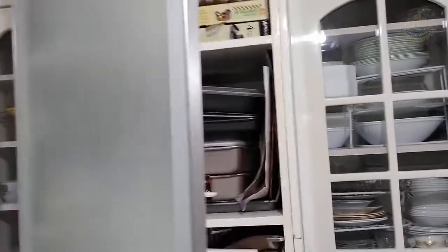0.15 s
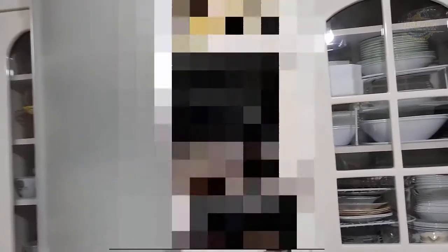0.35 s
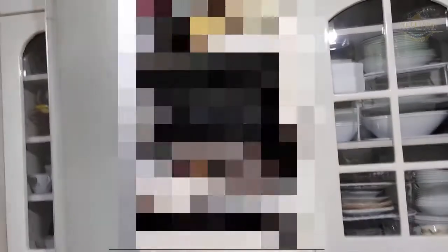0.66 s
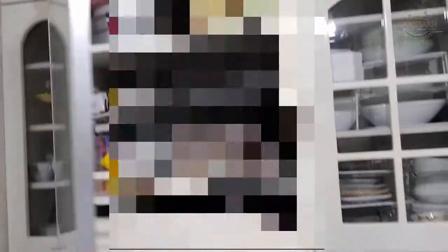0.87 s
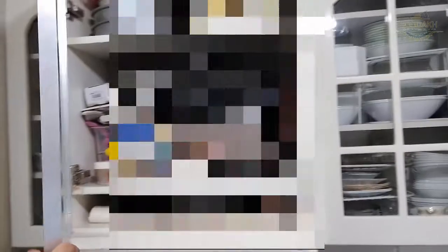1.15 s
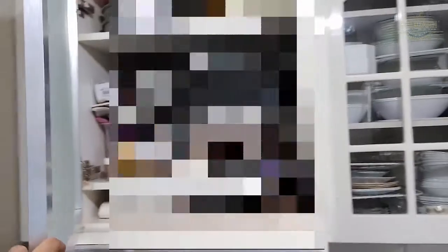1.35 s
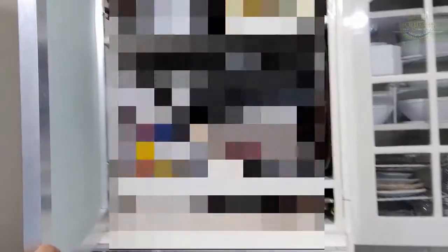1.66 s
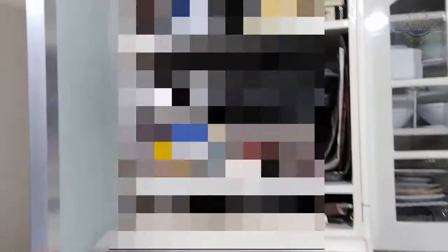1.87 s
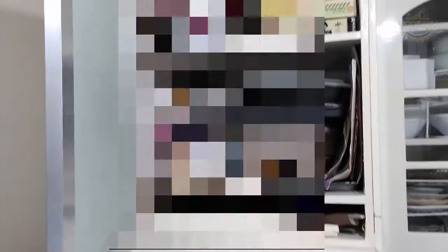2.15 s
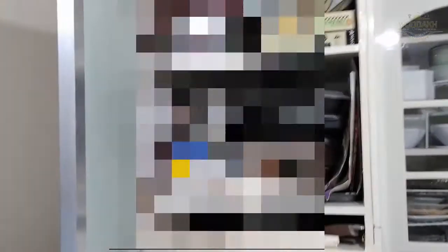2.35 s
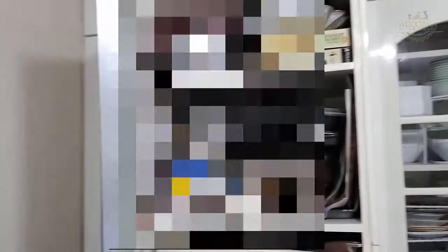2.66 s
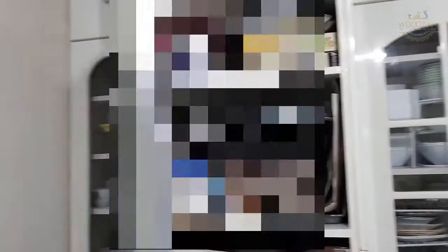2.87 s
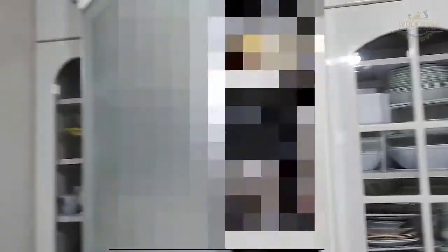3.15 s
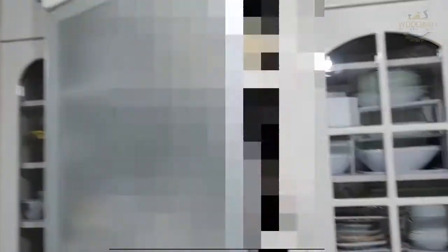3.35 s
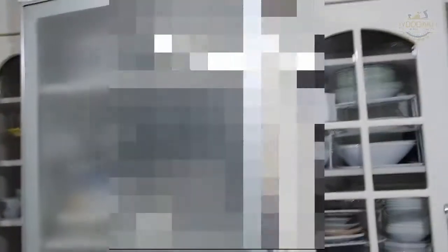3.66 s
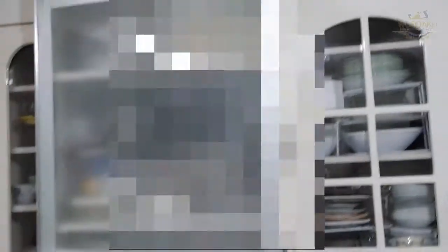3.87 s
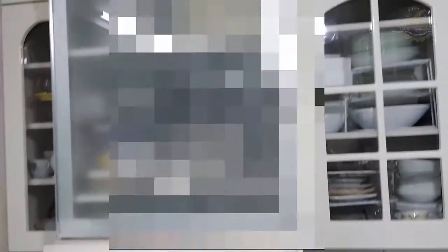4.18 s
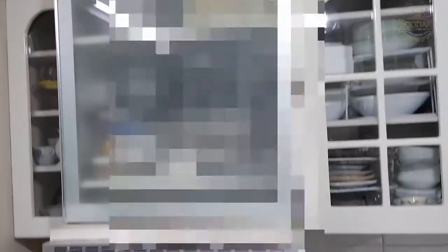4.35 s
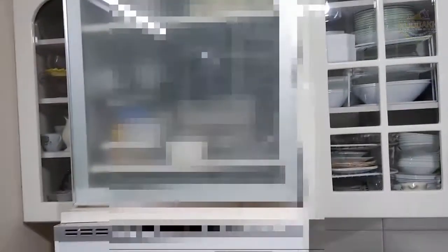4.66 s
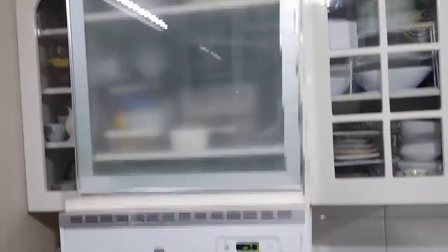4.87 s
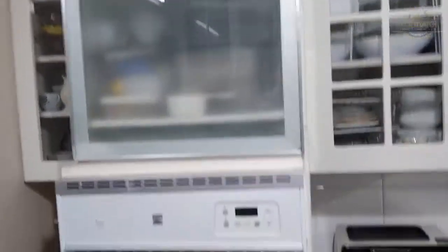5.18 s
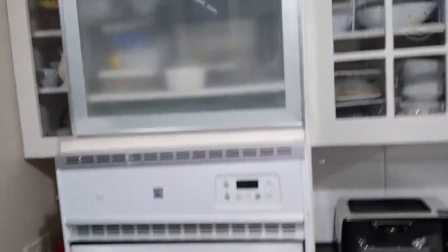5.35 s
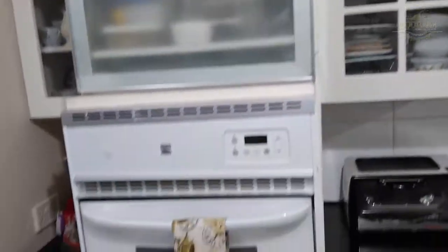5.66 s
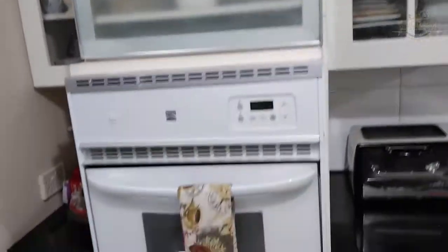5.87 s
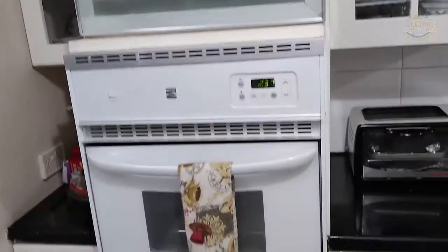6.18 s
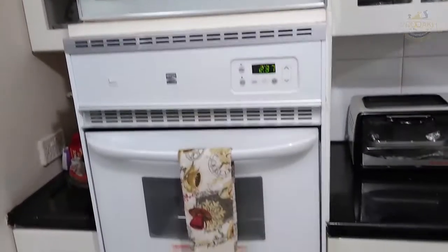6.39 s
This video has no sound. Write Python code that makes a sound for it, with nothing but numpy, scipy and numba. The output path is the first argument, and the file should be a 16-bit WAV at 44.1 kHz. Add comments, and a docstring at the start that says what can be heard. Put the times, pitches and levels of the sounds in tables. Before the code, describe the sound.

A handheld phone close to a kitchen cabinet picks up steady fan air, a thin wavering tone and mains buzz. The door is worked open with a rub and crisp latch clicks, rubbed again to a hard bright click, then closed gently with a series of duller woody bumps, low thuds and light rattles. Hard walls add a short, wide reverberation.

```python
"""A cabinet door in a quiet kitchen is opened and shut: latch rattle, bright ticks, ringing wood, soft thuds.
Drags over wood are dense random slips that drive its modes; soft bumps are short decaying sines.
Behind them: fan whine, weak drone, mains hum, lamp buzz as drifting harmonics, air as shaped noise.
The tiled room rings on as decaying noise; after the brightest click the whole level dips and creeps back.
Two microphone ports of a phone, a hand apart, each lose a late copy of the other, which widens the picture."""
import sys
import numpy as np
from scipy import signal
from scipy.fft import rfft, irfft
from scipy.io import wavfile
from scipy.ndimage import uniform_filter1d
from numba import njit

SR = 44100
rng = np.random.default_rng(int(sys.argv[2]) if len(sys.argv) > 2 else 0)


def wav_record(signal):
    """Record a signal, one row per channel, as 16-bit PCM in the file named by sys.argv[1]."""
    frames = np.transpose(np.atleast_2d(signal))
    bounded = np.clip(frames, -1, 1)
    # unit amplitude maps onto the largest positive 16-bit level
    quanta = np.round(bounded * 32767).astype(np.int16)
    wavfile.write(sys.argv[1], SR, quanta)


N = 287576

# modes of the wooden carcass, rung by drags and knocks: f/Hz, level/dB, t60/s
WOOD_MODES = [(155, 2, 0.044), (257.3, 4.5, 0.14), (302, 3.5, 0.15), (414, 2, 0.061), (645, -1, 0.15),
              (701, -2.5, 0.13), (774, 6.5, 0.037), (868, 4.5, 0.066), (1120, -7.5, 0.18)]
HZ = np.maximum(np.fft.rfftfreq(N, 1 / SR), 1)
TIME = np.arange(N) / SR
MAINS_HZ = 50.007
PORT_LAG_S = 1 / 2150


def undb(db):
    """Decibels to gain."""
    return 10 ** (np.asarray(db) / 20)


def over_hz(table, hz=HZ):
    """Read a spectrum table on a log-frequency axis."""
    f, v = np.transpose(table)
    return np.interp(np.log(hz), np.log(f), v)


def over_time(table):
    """Read a (t/s, value) table at every sample."""
    return np.interp(TIME, *np.transpose(table))


def unit(x):
    """Scale to rms 1."""
    return x / np.sqrt(np.mean(x ** 2))


def walk(rate_per_s):
    """Random levels joined smoothly; spread near 1."""
    k = int(SR / rate_per_s)
    knots = rng.standard_normal(N // k + 2)
    return 1.213 * uniform_filter1d(np.interp(np.arange(N) / k, np.arange(N // k + 2), knots), k)


def bands(table, hz=HZ):
    """Gain of resonances (f/Hz, width/Hz, level/dB) summed in power."""
    return np.sqrt(sum(undb(2 * db) / (1 + (2 * (hz - f) / w) ** 2) ** 2 for f, w, db in table))


def ring(modes, length):
    """Response of decaying modes to one push; neighbours start in opposite directions."""
    t = TIME[:length]
    out = 0
    for k, (f, db, t60) in enumerate(modes):
        out = out + (-1) ** k * undb(db) * np.sin(2 * np.pi * f * t) * 1000 ** (-t / t60)
    return out


def at_ports(pair, alike_most=0.99):
    """Two unrelated spectra as a broad source: ports alike in the bass, unrelated once the gap nears half a wave."""
    alike = alike_most * np.sinc(2 * HZ * PORT_LAG_S)
    mid, side = pair * np.sqrt([1 + alike, 1 - alike])
    return np.array([mid + side, mid - side])


def diffuse(gain):
    """Noise from all sides."""
    return irfft(at_ports(rfft(rng.standard_normal((2, N)))) * gain, N)


def room(x):
    """Reflections from all sides; every octave dies at its own pace; mean port energy 1."""
    # f/Hz, t60/s
    decay_times = [(100, 0.37), (500, 0.59), (2000, 0.56), (5000, 0.51), (13000, 0.33)]
    tail = 0
    for hz in 42.4 * 2 ** np.arange(9):
        octave = np.clip(1 - abs(np.log2(HZ / hz)), 0, 1) ** .5
        tail = tail + diffuse(octave) * 1000 ** (-TIME / over_hz(decay_times, hz))
    tail = tail * np.minimum(TIME / 0.0019, 1)
    energy = np.mean(np.sum(tail ** 2, axis=1))
    return irfft(rfft(x) * rfft(tail), N) / np.sqrt(energy)


def hum():
    """Mains fundamental, stronger at the front port."""
    # hum before the port shares: t/s, level/dB
    hum_levels = [(0, -77), (.5, -66), (1.8, -67), (2.6, -72), (3.3, -69), (4, -77), (5.2, -61), (5.7, -62),
                  (6.52, -66)]
    tone = np.sqrt(2) * undb(over_time(hum_levels)) * np.sin(2 * np.pi * MAINS_HZ * TIME)
    return np.array([.8 * tone, .3 * tone])


@njit
def stack(step, phase, gain, length):
    """Steady sines whose gains for each port drift, one value every 1024 samples."""
    out = np.zeros((2, length))
    for k in range(len(step)):
        for c in range(2):
            z, p = np.exp(1j * phase[c, k]), np.exp(1j * step[k])
            for i in range(length):
                j, a = i // 1024, (i % 1024) / 1024
                z *= p
                out[c, i] += z.imag * ((1 - a) * gain[c, k, j] + a * gain[c, k, j + 1])
    return out


def lamps(drift_db=7.5, scatter_db=1.5):
    """Mains buzz; each line swells and fades as the phone moves through the standing waves."""
    # main lines: multiple of the mains (rounded below), level at mid-time/dB, swell/(dB/s)
    buzz_lines = [(17, -69, -0.5), (28, -81.5, -4.5), (29, -72, -0.5), (36, -71, -3.5), (38, -68.5, 1.5),
                  (47, -64, 0), (49, -64, 1), (51, -65, 1.5), (53, -70, -1), (55, -67.5, 0.5),
                  (57, -74.5, 2.5), (61, -74, -1), (63, -76, 2), (64, -72, 0), (68.33, -72, 2),
                  (70.13, -68, 0.74), (72, -71, -1), (74, -79, 4), (104, -100, -3), (114, -74, 0),
                  (138.6, -73, 1), (143.9, -71.5, 1)]
    # all other multiples: f/Hz, level/dB
    buzz_rest = [(100, -80.5), (1000, -79.5), (2500, -82), (4000, -80.5), (6000, -82.5), (8000, -100),
                 (12000, -105)]
    order = np.arange(2, 242)
    db = over_hz(buzz_rest, order * MAINS_HZ) + scatter_db * np.minimum(rng.standard_normal(len(order)), 1)
    swell = np.zeros(len(order))
    for multiple, line_db, swell_db_per_s in buzz_lines:
        db[round(multiple) - 2], swell[round(multiple) - 2] = line_db, swell_db_per_s
    frames = N // 1024 + 2
    from_middle_s = (np.arange(frames) * 1024 - N / 2) / SR
    drift = uniform_filter1d(rng.standard_normal((2, len(order), frames)), size=11) * np.sqrt(11)
    line_db = db[:, None] + np.outer(swell, from_middle_s) + drift_db * np.minimum(drift, .8)
    phase = 2 * np.pi * rng.random((2, len(order)))
    return stack(2 * np.pi * order * MAINS_HZ / SR, phase, np.sqrt(2) * undb(line_db), N)


def room_tone():
    """Fan and fridge air with a few hollow resonances, and the lamps, rising and falling together."""
    # air spectrum: f/Hz, relative density/dB per Hz
    air_colour = [(25, -40), (33, -31), (42, -11.5), (55, -9), (75, -16), (100, -22.5), (160, -7),
                  (260, -4), (400, 1.5), (650, -13.5), (1000, -17.5), (1600, -9), (2500, -5), (3500, -16),
                  (5000, -23), (8500, -20.5), (12000, -23), (15500, -33.5)]
    # hollow resonances: f/Hz, width/Hz, lift/dB
    air_peaks = [(141, 32, 9), (197.5, 15, 11.5), (295, 18, 2.5), (605, 7.5, 11), (795, 49, 7.5),
                 (1149, 297, 9), (3890, 460, 7), (6840, 2200, 7), (9700, 1300, 8)]
    # slow changes: t/s, level of air and lamps/dB, air bass lift/dB, air top lift/dB
    steady_levels = [(0, -2, 4.5, 0), (.4, -2, 0.5, 0.5), (1, -3, 1.5, 0), (1.8, 0, 0.5, 0.5),
                     (2.8, -1.5, -2, -1.5), (3.4, -0.5, -2, -0.5), (4, 1.5, -1.5, 0), (4.5, 0, -1.5, -0.5),
                     (5, 0.5, 0, -0.5), (6.1, -0.5, -1, -0.5), (6.52, 2, -0.5, -2.5)]
    air_db = -48.5
    s, db, bass_db, top_db = np.transpose(steady_levels)
    peaks_db = sum(d / (1 + (2 * (HZ - f) / w) ** 2) for f, w, d in air_peaks)
    gain = undb(over_hz(air_colour) + peaks_db)
    low = 1 / (1 + (HZ / 600) ** 4)
    high = 1 / (1 + (5000 / HZ) ** 4)
    bass = diffuse(gain * np.sqrt(low))
    middle = diffuse(gain * np.sqrt((1 - low) * (1 - high)))
    # the top drifts on its own
    top = undb(np.interp(TIME, s, top_db) + 0.52 * walk(1.66)) * diffuse(gain * np.sqrt(high))
    treble = middle + top
    bass_gain = undb(np.interp(TIME, s, bass_db) + 0.63 * walk(4.743))
    treble_gain = undb(0.67 * walk(13) + 1.9 * walk(1.74))
    air = (bass * bass_gain + treble * treble_gain) / np.std(bass + treble)
    return undb(np.interp(TIME, s, db)) * (undb(air_db) * air + lamps())


def drone():
    """Weak motor tone under the whine that wavers, comes and goes."""
    # t/s, peak level/dB
    drone_levels = [(0, -54), (.9, -61.5), (1.4, -60), (2.5, -59), (3.1, -61), (3.7, -52.5), (4.1, -64),
                    (5, -68), (6.52, -65)]
    phase = 2 * np.pi * np.cumsum(352.5 + 4.09 * walk(4.5)) / SR
    return undb(over_time(drone_levels) + 1.2 * walk(8.1)) * np.sin([phase, phase - .15])


def whine():
    """Fan blade tone that wavers a little and slowly sags in pitch."""
    # t/s, rms level/dB
    whine_levels = [(0, -61), (.6, -59.5), (1.1, -56), (1.9, -66), (3.7, -67.5), (3.85, -55.5), (4.8, -51),
                    (5.3, -53), (6, -57.5), (6.52, -56)]
    start_hz, sag_hz_per_s = 439.5, 0.9
    phase = 2 * np.pi * np.cumsum(start_hz - sag_hz_per_s * TIME + 1.49 * walk(6.8)) / SR
    gain = np.sqrt(2) * undb(over_time(whine_levels) + 0.43 * walk(8.2))
    return gain * np.sin([phase, phase - .2])


def bumps(cycles=5.3):
    """Soft low bumps as the door settles: sines that fall 60 dB within a few cycles."""
    # t/s, level before decay and soft onset/dB, f/Hz
    bump_list = [(3.408, -43, 300), (3.423, -53, 260), (3.51, -38, 384), (4.563, -40, 300),
                 (4.578, -41.5, 200), (5.004, -57, 65), (5.385, -41, 200), (4.007, -44, 300),
                 (4.038, -46, 322), (4.053, -44, 260), (4.065, -49, 304), (4.126, -44, 380),
                 (4.166, -49, 220), (5.005, -39, 270), (5.029, -42, 190)]
    out, length = np.zeros(N), SR // 10
    onset = np.minimum(TIME[:length] / .001, 1)
    for s, db, hz in bump_list:
        i = int(s * SR)
        out[i:i + length] += ring([(hz, db, cycles / hz)], length) * onset
    return out


def drags():
    """Dense uneven slips shake the wood, boom in the hollow carcass and hiss at the contact."""
    # start/s, attack/s, stop/s, level/dB, sag/(dB/s), hiss/dB, boom/dB, boom step at the stop/dB,
    # singing panel f/Hz, panel/dB, floor rumble/dB; hiss, boom, panel and rumble are relative to level
    drag_list = [(0.995, 0.026, 1.4, -53.5, 4, 6.5, -18, -6, 260, -18, -24),
                 (1.075, 0.097, 1.21, -34.5, 6, -7, -9, 4.5, 430, -12.5, -21.5),
                 (1.955, 0.085, 2.195, -37.5, 41, 1.5, -9, 1.5, 260, -11, -34)]
    # rub and hiss spectrum: f/Hz, relative density/dB per Hz
    drag_colour = [(100, -18), (160, -4.5), (260, 1), (400, 0), (650, 2), (1000, -1.5), (1600, -5),
                   (2500, -19.5), (3500, -24.5), (5000, -29), (8500, -28), (12000, -41), (15500, -45)]
    slips_per_s, judder_per_s, judder_db = 1500, 95, -7  # judder: hard slips among the fine ones
    boom_hz, boom_width_hz = 153, 26
    rise_db, uneven_db, panel_sag_db_per_s = 16.5, 0.5, 42
    # after the stop: level step, fall rate, the boom's own fall rate, extra hiss step
    settle_db, settle_db_per_s, settle_boom_db_per_s, settle_hiss_db = -7, 34, 29, -12

    force = undb(2.7 * np.minimum(rng.exponential(size=N), 3))
    fine = rng.standard_normal((2, N)) * force * (rng.random(N) < slips_per_s / SR)
    judder = unit(-undb(1.3 * rng.standard_normal(N)) * (rng.random(N) < judder_per_s / SR))
    slips = unit(fine) + undb(judder_db) * judder * np.array([[1], [.3]])
    slips = slips + .8 * rng.standard_normal((2, N))
    slips = at_ports(rfft(slips)) / (1 + (142 / HZ) ** 16)  # spectra from here on

    colour = undb(over_hz(drag_colour))
    body = irfft(slips * colour / (1 + (HZ / 1800) ** 8), N)
    wood = irfft(slips * rfft(ring(WOOD_MODES, SR // 2), N), N)
    rub = undb(uneven_db * walk(44.6)) * unit(unit(body) + 0.053 * unit(wood))
    boom = unit(irfft(slips * bands([(boom_hz, boom_width_hz, 0)]), N))
    hiss = unit(diffuse(colour / (1 + (2000 / HZ) ** 8)))
    rumble = unit(diffuse(bands([(49.7, 24, -1.2), (84, 32, -0.36)]) / (1 + (33 / HZ) ** 6)))

    out = 0
    for (start_s, attack_s, stop_s, db, sag_db_per_s, hiss_db, boom_db, boom_step_db,
         panel_hz, panel_db, rumble_db) in drag_list:
        panel = unit(irfft(slips * bands([(panel_hz, 32, 0)]), N))
        panel = undb(panel_db + 3.3 * walk(19.2)) * panel
        # rise, sag while sliding, then a step down and a fading rumble
        rise = np.clip((TIME - start_s) / attack_s, 0, 1)
        sliding = np.clip(TIME - start_s - attack_s, 0, stop_s - start_s - attack_s)
        stopped = np.clip((TIME - stop_s) / 0.011, 0, 1)
        after = np.maximum(TIME - stop_s, 0)
        level_db = db - rise_db * (1 - rise) ** 2 - sag_db_per_s * sliding
        level_db = level_db + settle_db * stopped - settle_db_per_s * after
        hiss_gain = undb(hiss_db + settle_hiss_db * stopped)
        boom_gain = undb(boom_db + boom_step_db * stopped + (settle_db_per_s - settle_boom_db_per_s) * after)
        panel_gain = undb(-panel_sag_db_per_s * (sliding + after))
        parts = rub + panel_gain * panel + undb(rumble_db) * rumble + hiss_gain * hiss + boom_gain * boom
        out = out + np.minimum(4 * rise, 1) * undb(level_db) * parts
    return out


def knocks():
    """Each blow: a rattle of the latch, a bright tick, the ring of the wood and a thud through the floor."""
    # t/s, click/dB, wood/dB, tick/dB, tick f/Hz, thud/dB, thud f/Hz, rattle decay/s, latch tilt/(dB/octave);
    # wood, tick and thud are relative to click
    blows = [(0.9843, -30, -10, -27, 5720, -35, 55, 0.0061, -8.5),
             (1.3025, -29.5, -15, -5, 9000, -40, 52, 0.0018, -4),
             (1.3113, -19.5, -20, -5, 10290, -32, 52.8, 0.0022, -2.5),
             (2.1931, -21, -26, 0, 11700, -53, 54.5, 0.0021, -4.5),
             (2.3081, -26.5, -21, -11, 8150, -52, 55, 0.0049, -7.5),
             (3.176, -34.5, -27, -40, 6050, -40, 55, 0.005, -2.5),
             (3.4382, -32, -8.5, -6.5, 7540, -46, 55, 0.013, -3.5),
             (4.1102, -42, -10.5, -12, 5600, -40, 70, 0.0053, 1),
             (4.17, -55.5, -7, -20, 5600, -6, 72, 0.0054, -1),
             (4.5493, -29, -4.5, -12.5, 6500, -18, 58, 0.0091, -2.5),
             (4.607, -39, -6, -27, 5640, -12.5, 67.5, 0.0044, -4),
             (4.655, -55, -16, -25, 5640, -1, 70, 0.005, -3),
             (4.988, -41.5, -2, -15, 7000, -25, 67.4, 0.018, -6),
             (5.319, -34.5, -6.5, -15, 5900, -38, 55.3, 0.016, -3),
             (5.357, -45, 1.5, -8, 6050, -16, 67.3, 0.0062, -1),
             (5.378, -46.5, -5, -22, 6000, -25, 60, 0.0052, -2),
             (5.589, -44.5, -2.5, -21, 5500, -11, 50, 0.0045, 1)]
    # latch resonances: f/Hz, width/Hz, level/dB
    latch_bands = [(1620, 750, 0.5), (2340, 620, 8.5), (3560, 2600, -0.5)]
    # tick resonances: f/Hz, width/Hz, level/dB
    tick_bands = [(6000, 3300, -7.5), (8300, 3400, -1.5), (11400, 5600, -4.5)]
    # room against the blow, set by the time of the blow: t/s, level/dB
    room_share = [(1, -7), (2.2, 0), (3.1, -9), (3.5, 4.5), (5.6, -3)]
    rattle_rise = 0.17  # share of the rattle decay
    thud_s, thud_room_db = 0.017, -9

    near, far, length = np.zeros((2, N)), np.zeros(N), SR // 2
    t, hz = TIME[:length], np.fft.rfftfreq(length, 1 / SR)
    thin = 1 / (1 + (400 / np.maximum(hz, 1)) ** 4)  # small metal parts give no bass
    damped_wood = ring([(f, db, 0.28 * t60) for f, db, t60 in WOOD_MODES], length)
    for s, click_db, wood_db, tick_db, tick_hz, thud_db, thud_hz, rattle_s, tilt_db in blows:
        decay = np.minimum(t / (rattle_rise * rattle_s), 1) * np.exp(-t / rattle_s)
        energy = np.sqrt(np.sum(decay ** 2))
        # loose parts bounce unevenly
        bounces = np.interp(t * 260, np.arange(140), rng.standard_normal(140))
        chatter = undb(3.8 * np.minimum(t / 0.011, 1) * bounces)

        latch = bands(latch_bands, hz) * undb(tilt_db * np.log2(np.maximum(hz, 700) / 2000))
        tick = bands(tick_bands + [(tick_hz, 1500, 2)], hz)
        metal = (unit(latch) + undb(tick_db) * unit(tick)) * thin
        rattle = irfft(rfft(rng.standard_normal(length)) * metal, length) * decay * chatter
        rattle = irfft(rfft(rattle) * thin, length)
        # bounces share out the energy of the blow
        rattle = rattle * energy * np.sqrt(np.mean(metal ** 2) / np.sum(rattle ** 2))
        # the walls hear the rattle as one short snap of the same colour and energy
        snap = np.roll(irfft(metal, length), 64) * energy

        # the door beds in: a soft push with a chattering tail
        push_decay = np.exp(-t / 0.0057) + 0.26 * chatter * np.exp(-t / 0.034)
        push = rng.standard_normal(length) * np.minimum(t / 0.0059, 1) * push_decay
        wood = signal.fftconvolve(push, damped_wood)[:length]
        wood = undb(wood_db) * wood / wood.max()
        thud = np.sin(2 * np.pi * thud_hz * t) * t * np.exp(-t / thud_s)
        thud = undb(thud_db) * thud / thud.max()

        i = int(s * SR)
        lag = rng.integers(0, 12)  # samples; the rear port hears it later
        direct = undb(click_db) * (rattle + wood + thud)
        near[0, i:i + length] += direct
        near[1, i + lag:i + lag + length] += direct
        far_gain = undb(click_db + np.interp(s, *np.transpose(room_share)))
        far[i:i + length] += far_gain * (snap + wood + undb(thud_room_db) * thud)
    return near, far


def dip():
    """Gain that drops quickly, holds, and climbs back evenly in dB."""
    start_s, depth_db = 2.197, -7.5
    fall_s, hold_s, recover_s = 0.025, 0.37, 0.82
    corners_s = np.cumsum([0, fall_s, hold_s, recover_s])
    return undb(np.interp(TIME - start_s, corners_s, [0, depth_db, depth_db, 0]))


def scene():
    """Sound at the two ports: direct sources, their room and the background, all under the dip."""
    near, far = knocks()
    drag, bump = drags(), bumps()
    direct = near + bump + drag
    reflected = room(far + bump + undb(-4.0) * drag[0])
    background = room_tone() + whine() + drone() + hum()
    return dip() * (direct + reflected + background)


def record(dry):
    """Each port loses a late copy of the other; the bass that this thins is lifted again; the top is cut."""
    # rear port response: f/Hz, gain/dB
    rear_port = [(100, 0.5), (400, 0.7), (900, -0.6), (1500, -1), (5400, -6.5), (6000, -1), (10000, -7),
                 (15000, 0)]
    # late share of the other port: f/Hz, share (linear)
    cross_share = [(100, 0.69), (1000, 0.92), (5400, 0.91), (6000, 0.26), (9000, 0.082), (12000, .05)]
    # right channel over left: f/Hz, lift/dB
    right_lift = [(30, 4), (60, 0.8), (125, 4), (300, 1.5), (600, 2), (1200, -1)]
    top_hz = 15800
    front, rear = rfft(dry)
    rear = rear * undb(over_hz(rear_port))
    late = over_hz(cross_share) * np.exp(-2j * np.pi * HZ * PORT_LAG_S)
    lift = 0.67 * np.sqrt(1 + (450 / np.maximum(HZ, 110)) ** 2)
    left = front - late * rear
    right = (rear - late * front) * undb(over_hz(right_lift))
    wide = irfft(lift * np.array([left, right]), N)
    return signal.sosfilt(signal.ellip(10, .2, 70, top_hz, fs=SR, output="sos"), wide)


dry = scene()
out = record(dry)
wav_record(out)
```